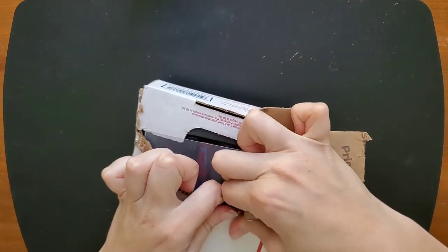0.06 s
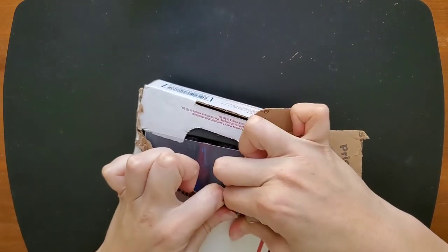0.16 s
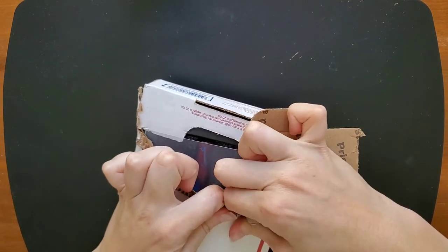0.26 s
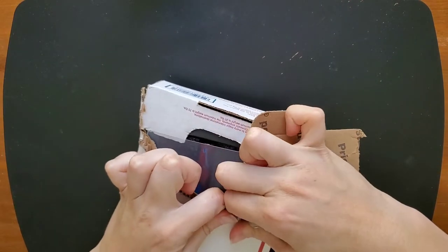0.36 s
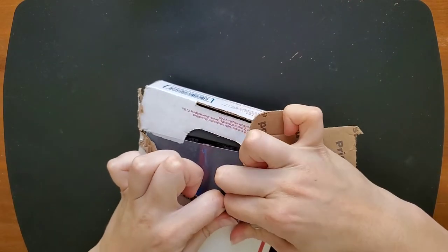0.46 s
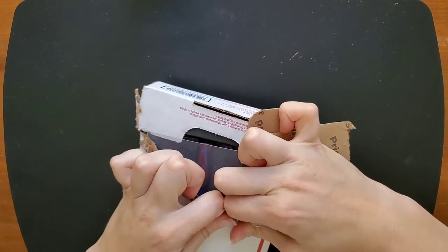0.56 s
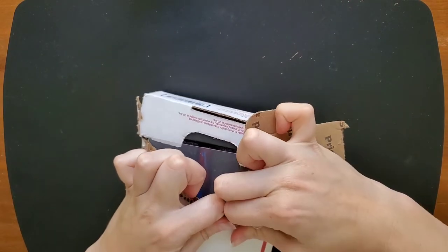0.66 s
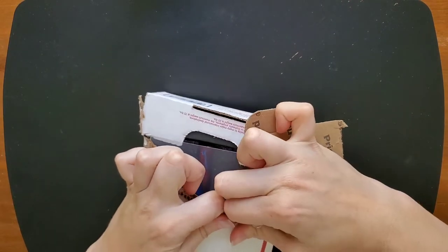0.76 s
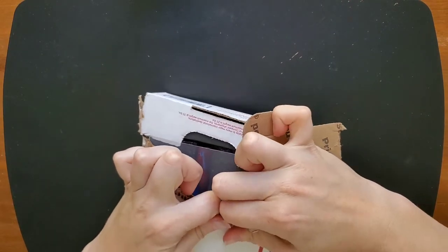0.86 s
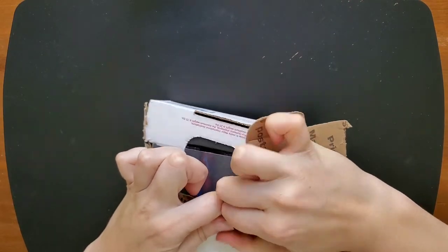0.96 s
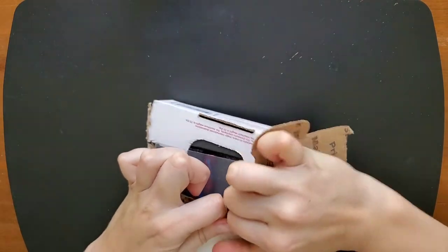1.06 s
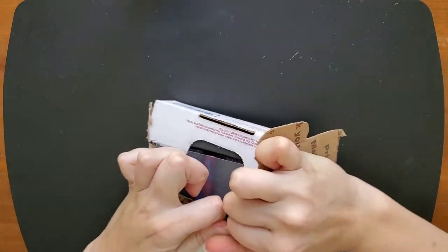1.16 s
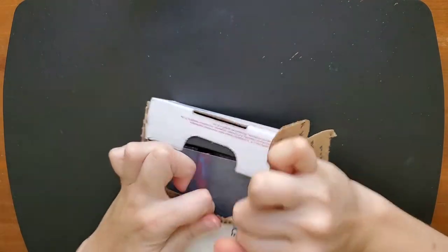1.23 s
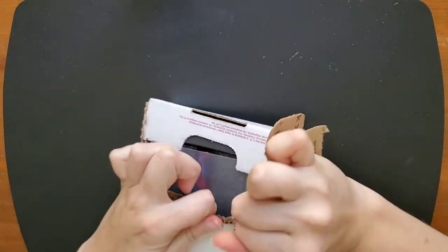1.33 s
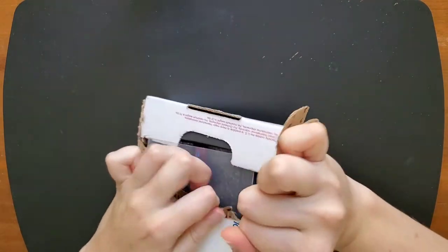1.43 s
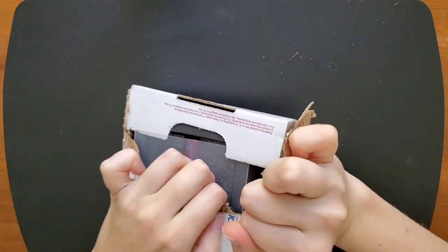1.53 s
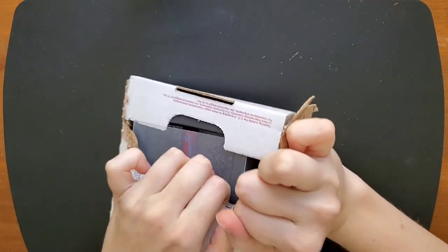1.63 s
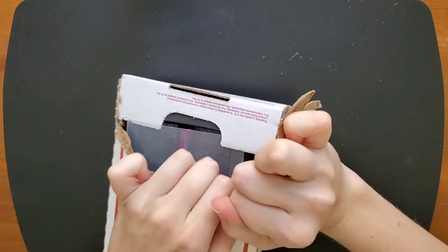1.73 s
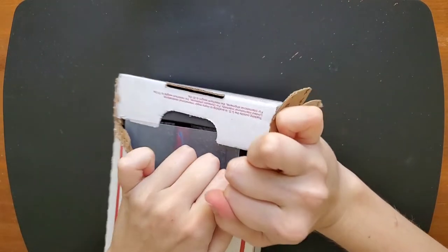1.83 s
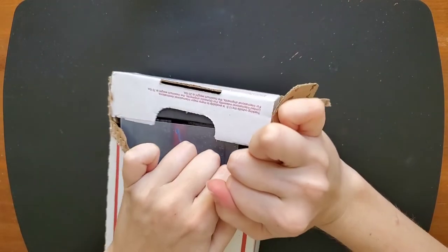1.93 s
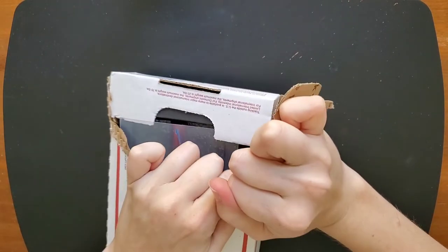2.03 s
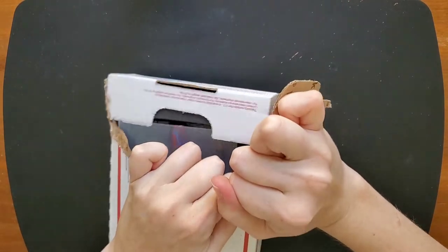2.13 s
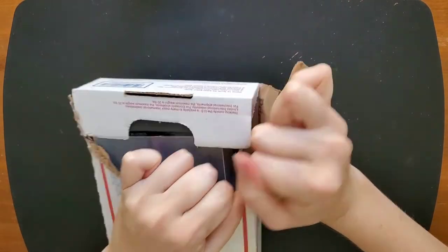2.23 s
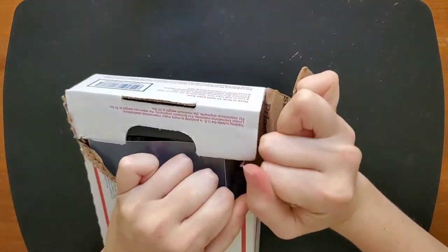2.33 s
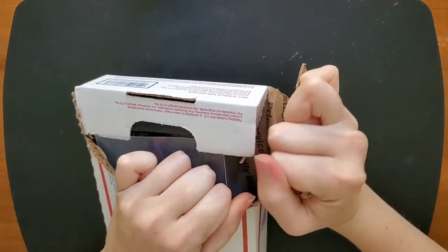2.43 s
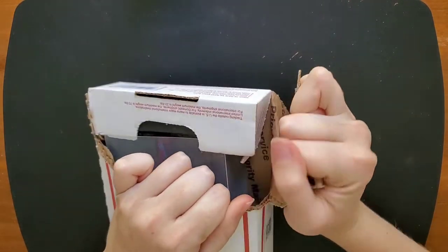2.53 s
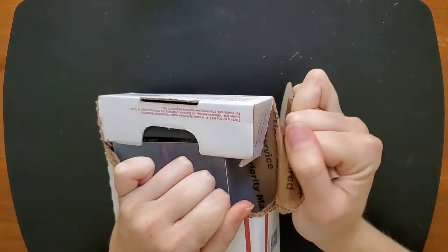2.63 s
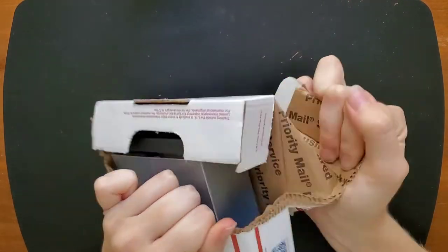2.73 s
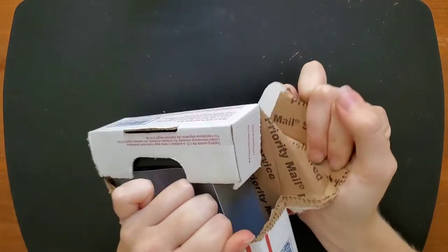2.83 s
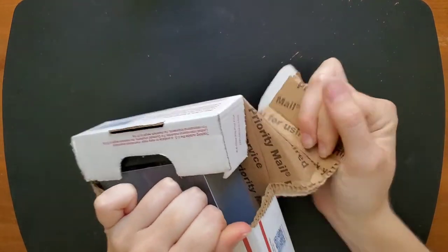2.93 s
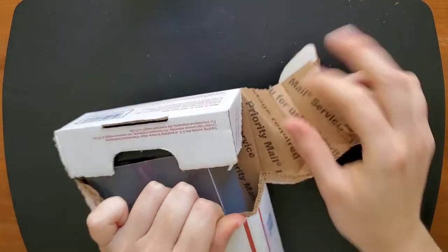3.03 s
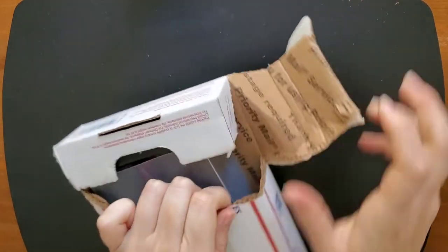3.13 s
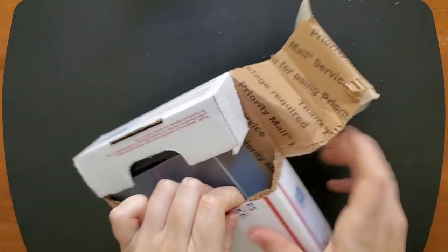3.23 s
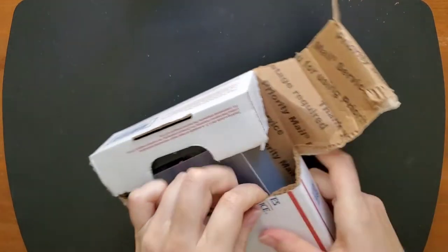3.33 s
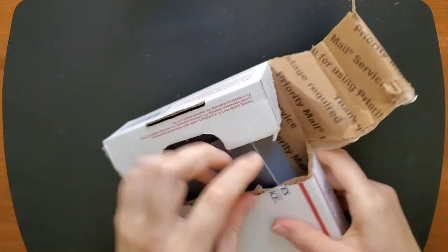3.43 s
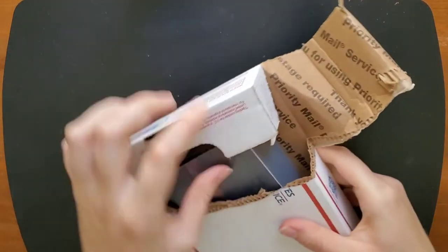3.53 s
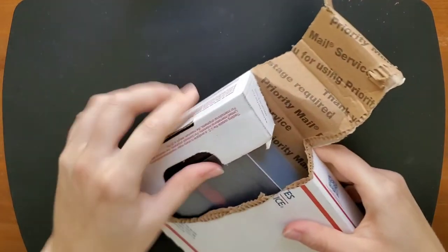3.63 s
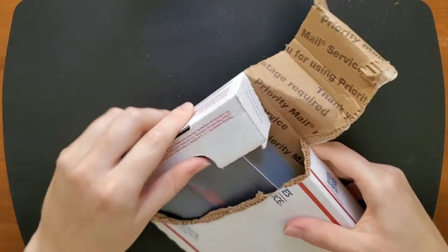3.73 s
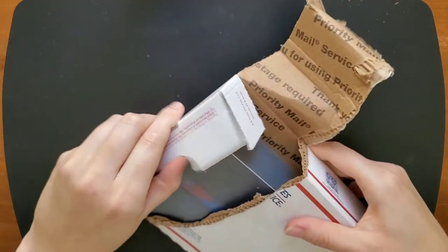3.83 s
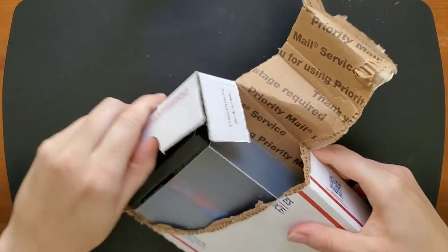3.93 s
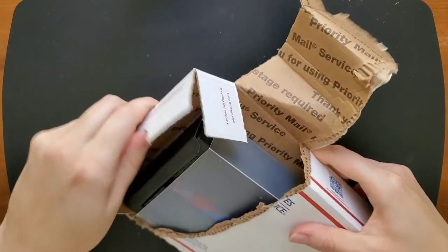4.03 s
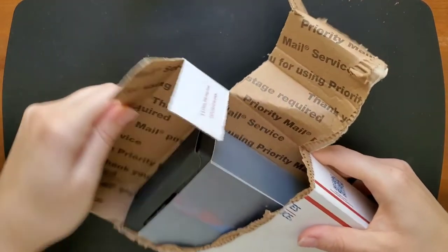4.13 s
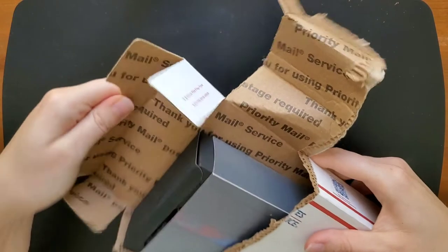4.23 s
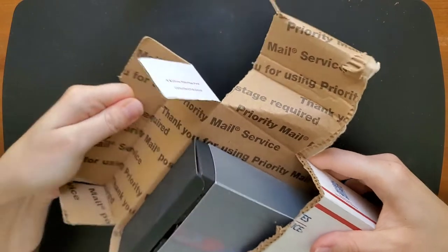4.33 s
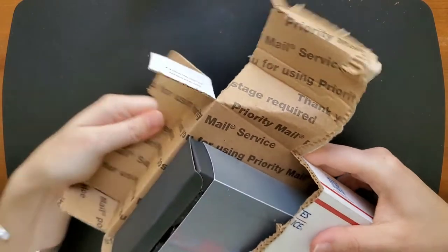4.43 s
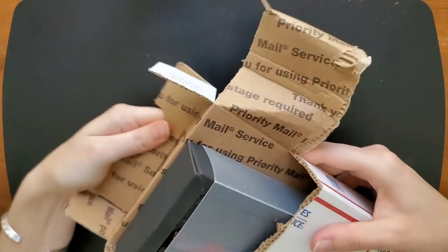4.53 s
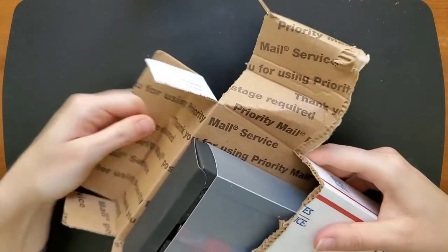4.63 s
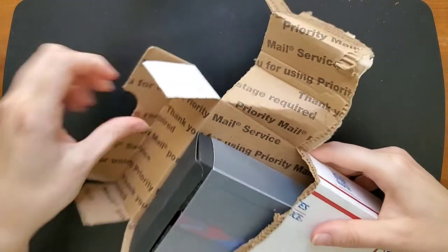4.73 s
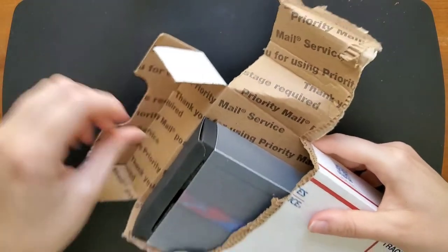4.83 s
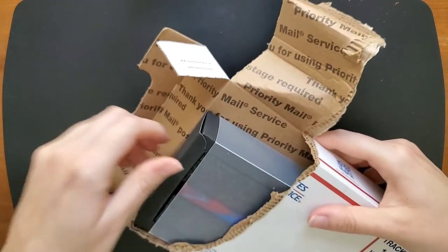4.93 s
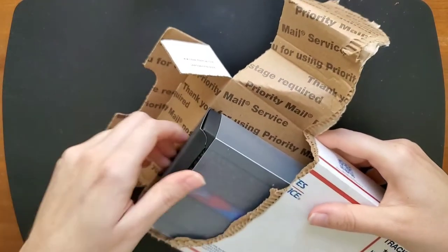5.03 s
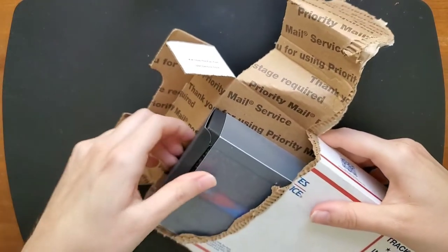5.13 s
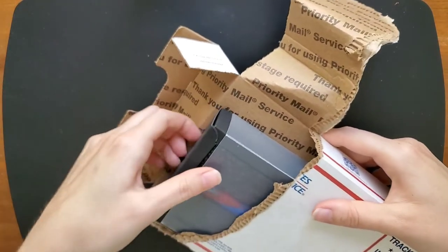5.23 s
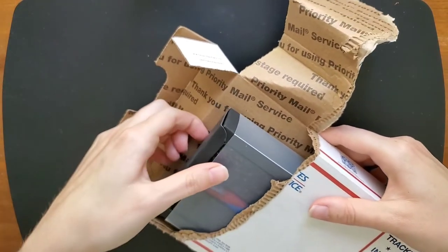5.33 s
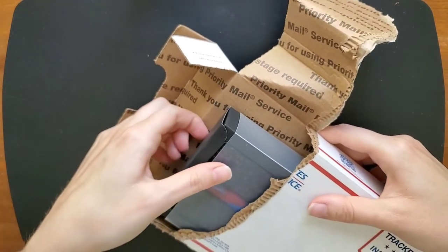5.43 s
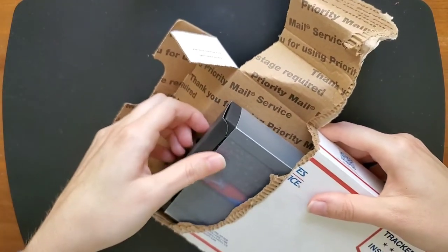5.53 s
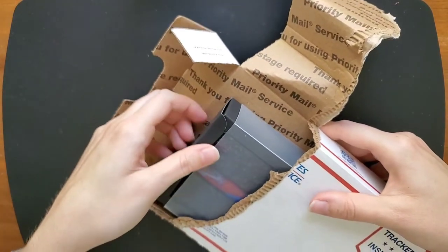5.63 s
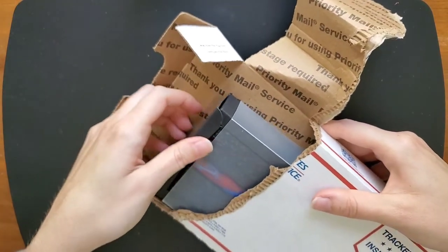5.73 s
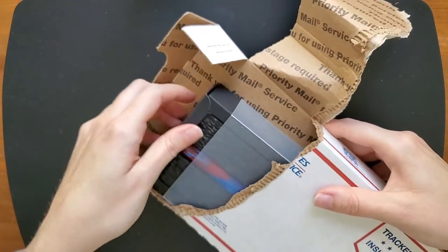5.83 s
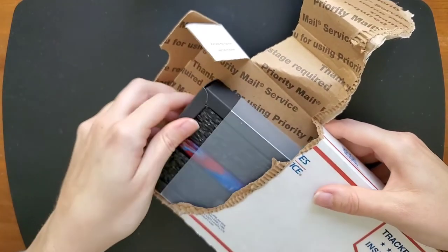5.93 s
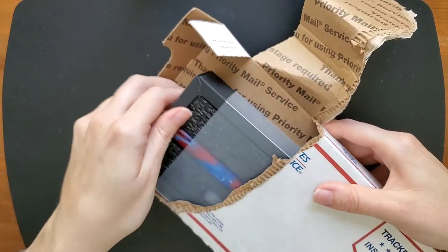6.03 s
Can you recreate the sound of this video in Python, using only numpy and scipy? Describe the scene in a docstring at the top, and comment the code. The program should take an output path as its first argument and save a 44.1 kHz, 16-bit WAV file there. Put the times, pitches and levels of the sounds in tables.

```python
"""A desk in a quiet room: two hands bend and rip a corrugated box, close under a phone with two microphones.
Room tone, desk rumble and creaking board (noise gated by slips) run from the start; folds soon begin to snap.
Snaps are noise bursts ringing panels and box, with torn fibre hiss; small flute breaks and desk bumps (decaying
sines) join in. The loudest cracks come near 1.26 s, 2.31 s and 2.76 s; from about 4.1 s the handling is mostly
lighter, with a strong snap near 5.08 s and harder creaking towards the end at 6.06 s."""
import sys
import numpy as np
from scipy import signal
from scipy.fft import rfft, irfft, next_fast_len
from scipy.io import wavfile
from scipy.ndimage import uniform_filter1d, map_coordinates

SR = 44100
rng = np.random.default_rng(int(sys.argv[2]) if len(sys.argv) > 2 else 0)


def wav_record(signal):
    """Record a signal, one row per channel, as 16-bit PCM in the file named by sys.argv[1]."""
    frames = np.transpose(np.atleast_2d(signal))
    bounded = np.clip(frames, -1, 1)
    # unit amplitude maps onto the largest positive 16-bit level
    quanta = np.round(bounded * 32767).astype(np.int16)
    wavfile.write(sys.argv[1], SR, quanta)


def to_linear_factor(level_db):
    """Convert decibel levels (scalar or array-like) to linear amplitude factors."""
    exponent = np.asarray(level_db, float) / 20
    return 10 ** exponent


N = 267246  # samples, 6.06 s


def unit(x):
    """Scaled to rms 1 along time, each channel by itself."""
    return x / np.sqrt(np.mean(x ** 2, axis=-1, keepdims=True) + 1e-20)


def along(points, hz):
    """(f/Hz, value) points read on a log frequency axis."""
    f, v = np.transpose(points)
    return np.interp(np.log(hz + 1), np.log(f + 1), v)


def filtered(x, response):
    """x times a response of frequency."""
    m = next_fast_len(x.shape[-1] + 8192)
    spectrum = rfft(x, m) * response(np.fft.rfftfreq(m, 1 / SR))
    return irfft(spectrum, m)[..., :x.shape[-1]]


def causal(gain):
    """Minimum-phase response with the given gain, by folding the cepstrum."""
    cep = irfft(np.log(gain + 1e-6))
    half = cep.shape[-1] // 2
    cep[..., 1:half] *= 2
    cep[..., half + 1:] = 0
    return np.exp(rfft(cep))


def peak(hz, centre_hz, width_hz):
    """Gain of one resonance, 1 at its centre."""
    return hz * width_hz / np.hypot(centre_hz ** 2 - hz ** 2, hz * width_hz)


def coloured(spectrum):
    """A steady colour from (f/Hz, level/dB) points."""
    return lambda hz, t: to_linear_factor(along(spectrum, hz))


def wobble(rate):
    """A smooth random curve, rate knots a second."""
    knots = rng.standard_normal(int(N * rate / SR) + 4)
    return map_coordinates(knots, [np.arange(N) * rate / SR])


def curves(rows):
    """One value per sample for each column after the time."""
    s, *cols = np.transpose(rows)
    return [np.interp(np.arange(N) / SR, s, c) for c in cols]


def at_times(curve):
    """A per-sample curve as a function of t/s."""
    return lambda t: np.interp(t * SR, np.arange(N), curve)


# likeness of left and right at the two microphones: f/Hz, correlation [0-1]
ALIKE = [(60, 0.51), (200, 1), (300, 0.51), (450, 0.59), (900, 0.15), (2400, 0.17), (8000, 0.047)]


def ports(pair, hz):
    """Two independent spectra mixed to left and right so that they correlate by ALIKE."""
    turn = np.arccos(np.clip(along(ALIKE, hz), 0, 1)) / 2
    mid, side = pair[0] * np.cos(turn), pair[1] * np.sin(turn)
    return np.array([mid + side, mid - side])


def texture(gain, grain, patchy_db):
    """Stereo noise gated by grain, coloured by gain(Hz, s), with patches shifting in time and pitch; rms 1."""
    hz, t, z = signal.stft(grain * rng.standard_normal((2, N)), SR, nperseg=512)
    field = uniform_filter1d(rng.standard_normal(z.shape[1:]), size=3, axis=0)
    field = uniform_filter1d(field, size=12, axis=1)
    patches = to_linear_factor(patchy_db * field / field.std())
    z = ports(z, hz[:, None]) * gain(hz[:, None], t) * patches
    return unit(signal.istft(z, nperseg=512)[1][:, :N])


# resonances of the hollow box: f/Hz, width/Hz, level/dB
BOX = [(420, 360, -4.5), (520, 39, -24), (615, 20, -25.5), (810, 45, 4), (1200, 110, -0.5),
       (1400, 480, -4.5), (1620, 46, -1.5), (2010, 270, -8), (2490, 62, -3), (2830, 320, -28.5),
       (3780, 350, -25)]


def hollow(hz, db, between_db):
    """Gain of the box resonances at strengths db, over a flat board at between_db."""
    centre, width, _ = np.transpose(BOX)[..., None]
    return np.sqrt(to_linear_factor(db) ** 2 @ peak(hz, centre, width) ** 2 + to_linear_factor(between_db) ** 2)


# strain on the board, heard as creak: t/s, level/dB
STRAIN = [(0, -51.5), (.04, -59.5), (.09, -53.5), (.14, -58.5), (.2, -54.5), (.25, -64), (.3, -63.5),
          (.38, -55), (.44, -56), (.52, -57), (.585, -52), (.66, -48.5), (.75, -63.5), (.8, -62),
          (.87, -60.5), (.95, -48.5), (1.01, -45), (1.1, -56), (1.22, -57), (1.24, -44.5), (1.26, -27.5),
          (1.32, -42), (1.39, -59.5), (1.45, -63), (1.6, -49.5), (1.72, -53), (1.85, -58), (1.92, -54.5),
          (2.12, -61.5), (2.2, -61), (2.26, -49), (2.3, -36), (2.33, -31.5), (2.37, -36), (2.41, -54.5),
          (2.55, -63), (2.6, -52), (2.66, -49), (2.7, -38.5), (2.755, -27.5), (2.8, -31.5), (2.83, -34.5),
          (2.87, -46.5), (2.98, -55.5), (3.04, -46.5), (3.13, -54.5), (3.2, -53.5), (3.28, -59),
          (3.34, -53), (3.39, -61.5), (3.43, -59.5), (3.47, -56), (3.63, -53), (3.69, -64), (3.75, -64),
          (3.82, -49.5), (3.89, -40), (3.925, -54), (3.95, -57), (4.04, -51.5), (4.09, -65), (4.12, -60.5),
          (4.15, -51), (4.195, -49.5), (4.23, -55.5), (4.28, -63.5), (4.38, -68), (4.47, -63),
          (4.63, -54.5), (4.72, -54), (4.8, -61.5), (4.84, -57.5), (4.856, -70.5), (4.91, -65), (4.95, -61),
          (4.978, -64.5), (5.01, -64), (5.05, -63), (5.12, -54.5), (5.21, -60), (5.235, -56), (5.28, -53),
          (5.34, -52), (5.43, -49.5), (5.5, -75), (5.55, -63), (5.63, -48.5), (5.68, -55), (5.73, -48.5),
          (5.78, -49), (5.84, -45.5), (5.88, -36.5), (5.94, -43), (5.98, -47), (6.035, -43.5),
          (6.06, -36.5)]
# grip, how freely the panels boom, how much fibre tears, how hard the box drags on the desk:
# t/s, boom level re creak/dB, fibre hiss level re creak/dB, drag level/dB
GRIP = [(0, 0.5, -7.5, 0), (.15, -1, -4, 8), (.4, -7, -10.5, 9), (.6, 8, -2.5, 10.5), (1.0, 7.5, -6.5, 13),
        (1.3, -1.5, -4.5, 6), (1.7, 4, -9, 1.5), (2.2, 2, -6, 9.5), (2.35, -10.5, -15, 10),
        (2.5, 2, 1.5, 1.5), (2.8, -12, -11.5, 9), (3.0, -6.5, -5, -5), (3.2, 0.5, 0, 3), (3.4, 5, -1.5, 3),
        (3.6, -6, -5, 0.5), (3.85, -9, -13, 2.5), (4.05, 1, -4.5, 1), (4.13, 3.5, -13.5, -9),
        (4.2, -3, -9.5, -5), (4.3, -8.5, -5, -1), (4.4, -3, -6.5, 0), (4.7, -5, -8.5, -5.5),
        (5.2, -6, -7, -2), (5.29, 8.5, -10, 1), (5.44, 4, -14, -6), (5.6, -4.5, -12.5, -3.5),
        (5.88, -0.5, -15.5, -10), (6.06, 0, -22.5, -14)]
RUMBLE_DB, RUMBLE_FOLLOWS = -57.5, 0.43  # dB at a creak of -51.5 dB and no drag; dB per dB of creak


def strain():
    """Creak, boom, fibre hiss and desk rumble in dB: the strain drives all, the grip shares it out."""
    (creak_db,), (boom_db, fibre_db, drag_db) = curves(STRAIN), curves(GRIP)
    rumble_db = RUMBLE_DB + RUMBLE_FOLLOWS * (creak_db + 51.5) + drag_db
    return creak_db, creak_db + boom_db, creak_db + fibre_db, rumble_db


def slips(rate, spread_db, life, share):
    """Envelope of stick-slip: random slips of scattered size, each dying in life seconds, over steady rubbing."""
    chance, size = rng.random((2, N))
    sizes = (chance < rate / SR) * to_linear_factor(spread_db * np.log(size + 1e-9))  # rate per second
    decay = np.exp(-np.arange(2000) / (life * SR))
    steady = np.sqrt(1 - share ** 2) * 0.31
    return steady + share * unit(signal.fftconvolve(sizes, decay)[:N])


# the panel under the fingers: t/s, middle pitch f/Hz, crackle share [0-1] before strain shifts it
# (tearing high, sliding low)
PANEL = [(0.0, 1900, 0.37), (0.15, 1400, 1), (0.7, 1400, 1), (1.3, 1600, 0.85), (2.0, 1690, 0.98),
         (2.35, 2700, 0.56), (2.6, 1820, 0.62), (2.72, 1370, 0.52), (2.8, 2220, 1), (2.9, 1890, 0.53),
         (3.2, 2630, 0.5), (3.45, 1980, 0.66), (3.71, 1400, 0.66), (3.75, 1900, 0.86), (3.84, 2400, 0.86),
         (3.88, 1400, 0.94), (4.0, 1900, 0.5), (4.08, 1900, 0.42), (4.12, 2700, 0.62), (4.21, 2600, 0.8),
         (4.24, 1900, 0.71), (4.34, 1820, 0.6), (4.4, 1190, 0.25), (4.63, 2680, 0.48), (4.8, 1600, 0.52),
         (5.05, 1790, 0.6), (5.2, 1900, 0.5), (5.23, 3180, 0.44), (5.38, 3100, 0.47), (5.41, 1900, 0.45),
         (5.52, 1400, 0.37), (5.65, 1680, 0.3), (5.75, 2030, 0.3), (5.87, 1320, 0.19), (6.06, 1830, 0.19)]
PANEL_WANDER = 0.11  # log wander of that pitch
# colour of the creaking board: f/Hz, level/dB
CREAK = [(400, -28), (750, -3.5), (1050, -4.5), (2500, -5), (3500, -7), (5000, -14), (8000, -45)]
# colour of the booming panels: f/Hz, level/dB
BOOM = [(150, -27.5), (300, -2.5), (420, 1), (850, -0.5), (1150, -9.5), (2000, -44.5)]
# colour of tearing fibre: f/Hz, level/dB
FIBRE = [(1500, -47), (2800, 9.5), (3600, 8), (4300, 7.5), (5500, 5), (7500, 6.5), (12000, -9),
         (16000, -10.5)]
RUSTLE_HZ, RUSTLE_WIDTH_HZ, RUSTLE_DB = 5500, 380, 7.5  # papery ring of skin sliding on the liner


def rubbing():
    """Strained board creaks around the pitch of the rubbed panel; the same slips shake the box and break fibres."""
    creak_db, boom_db, fibre_db, _ = strain()
    panel_hz, crackle = curves(PANEL)
    pitch = at_times(panel_hz * np.exp(PANEL_WANDER * wobble(16)))
    share = np.clip(crackle + 0.01 * (creak_db + 47.5), .1, .95)  # light touch slides evenly, hard strain crackles
    sliding, hiss_db = at_times(1 - share), at_times(fibre_db)

    def box(hz):
        return hollow(hz[:, 0], np.transpose(BOX)[2], between_db=-11.5)[:, None]

    def creak(hz, t):
        panel = to_linear_factor(2.0) * peak(hz, pitch(t), .12 * pitch(t))
        return to_linear_factor(along(CREAK, hz)) * np.hypot(box(hz), panel)

    def boom(hz, t):
        return to_linear_factor(along(BOOM, hz)) * box(hz)

    def rustle(hz, t):
        tilt = 0.026 * (hiss_db(t) + 77)  # dB per octave: hard tearing is brighter
        fibre = to_linear_factor(along(FIBRE, hz) + tilt * np.log2(hz / 7000 + 0.0012))
        skin = to_linear_factor(RUSTLE_DB) * sliding(t) * peak(hz, RUSTLE_HZ, RUSTLE_WIDTH_HZ)
        return fibre * np.hypot(1, skin)

    grain = slips(rate=200, spread_db=4, life=0.016, share=share)
    fine = slips(rate=300, spread_db=3.5, life=0.013, share=share)  # fibres also break on their own
    board = to_linear_factor(creak_db) * texture(creak, grain, patchy_db=3.0)
    board += to_linear_factor(boom_db) * texture(boom, grain, patchy_db=2.5)
    return board + to_linear_factor(fibre_db) * texture(rustle, 0.28 * grain + 1.2 * fine + 0.5, patchy_db=2.5)


# hands move sideways under the microphones: t/s, left lag/ms, left-right level difference/dB
PLACE = [(0, 0.1, -1), (1.2, 0.093, 0), (2.5, 0.077, -0.5), (3.1, 0.17, -0.5), (3.8, 0.074, -2),
         (4.1, 0.017, -0.5), (4.6, 0.073, 0.5), (5.3, -0.091, -2.5), (5.7, 0.19, -1)]


def placed(box):
    """Level and arrival time differ between the microphones as the hands move."""
    (lag_ms, pan_db), at = curves(PLACE), np.arange(N)
    half = lag_ms * SR / 2000  # half the lag, in samples
    left = map_coordinates(box[0], [at - half], order=5) * to_linear_factor(pan_db / 2)
    right = map_coordinates(box[1], [at + half], order=5) * to_linear_factor(-pan_db / 2)
    return np.array([left, right])


# colour of the desk rumble: f/Hz, level per Hz/dB
RUMBLE = [(15, -73), (25, -23), (70, -6), (114, -4), (151, -7), (184, -20), (300, -4.5), (390, -39),
          (660, -120)]


def rumble():
    """The box dragging on the desk top rumbles: low noise that follows strain and drag unsteadily."""
    level_db = strain()[3] + 3 * wobble(11)
    return to_linear_factor(level_db) * texture(coloured(RUMBLE), 1, patchy_db=3.5)


# colour of the room tone: f/Hz, level per Hz/dB
AIR = [(15, -55.5), (25, -32.5), (127, -37), (185, 1.5), (270, -28), (335, -1), (531, -24.5), (1160, -3.5),
       (1840, -17), (14800, -41), (16000, -57.5)]


def room_tone():
    """Faint steady noise of the quiet room."""
    return to_linear_factor(-70) * texture(coloured(AIR), 1, patchy_db=3)


# decay of the room: f/Hz, t60/s
ROOM = [(150, 0.29), (1000, 0.083), (5000, 0.1), (14000, 0.15)]


def room(x):
    """The room's answer, 300 samples late: each frequency of a noise tail dies at its own speed."""
    hz, t, z = signal.stft(rng.standard_normal((2, SR // 3)), SR, nperseg=256)
    decay = to_linear_factor(-60 * t / along(ROOM, hz)[:, None])
    tail = signal.istft(z * decay, SR, nperseg=256)[1]
    late = np.pad(x, ((0, 0), (300, 0)))
    return signal.fftconvolve(late, tail / np.linalg.norm(tail[0]), axes=1)[:, :N]


# low panels of the box, a small snap rings one of them: f/Hz
LOW_PANELS_HZ = [412, 497, 740, 840]
TICKS, TICK_DB, TICK_SPREAD_DB = 30, 9, 2.5  # count, peak over the creak, scatter
SMALL_T60_MS, SMALL_T60_SPREAD = 44, .1  # middle decay, log scatter


def ticks():
    """Small snaps at random moments, as loud as the strain allows; rows like SNAPS."""
    u, g = rng.random((TICKS, 2)).T, rng.standard_normal((TICKS, 4)).T
    s = u[0] * (N - 1) / SR
    db = np.interp(s, *np.transpose(STRAIN)) + TICK_DB + TICK_SPREAD_DB * g[0]
    low_hz, high_hz = rng.choice(LOW_PANELS_HZ, TICKS), 1100 + 1100 * u[1]
    high_db, fibre_db = -6 + 3 * g[1], -14 + 5 * g[2]
    t60_ms = SMALL_T60_MS * np.exp(SMALL_T60_SPREAD * g[3])
    return np.transpose([s, db, low_hz, high_hz, high_db, fibre_db, t60_ms])


# snaps of folds and seams: t/s, nominal peak level/dB, low panel f/Hz, high panel f/Hz,
# high panel level re peak/dB, fibre level re peak/dB, t60/ms
SNAPS = [(0.057, -32, 790, 1210, -4.5, -39, 55), (0.08, -24, 770, 2010, -5.5, -25, 55),
         (0.114, -28, 460, 1080, -25, -21, 38), (0.157, -26, 740, 1170, -3.5, -23, 58),
         (0.19, -25.5, 364, 1580, -0.5, -21, 48), (0.263, -34, 730, 1500, -16, -18, 35),
         (0.307, -32.5, 600, 1220, -3.5, -18, 39), (0.347, -30.5, 716, 1220, -3, -15, 42),
         (0.3665, -22, 373, 1250, -4.5, -23, 42), (0.39, -28, 376, 2000, -5.5, -14, 51),
         (0.417, -31, 810, 1640, -10, -22, 31), (0.458, -18, 800, 1590, -10, -20, 37),
         (0.505, -30, 740, 1400, -8, -30, 55), (0.538, -17, 720, 1220, -7.5, -16.5, 43),
         (0.57, -16, 840, 1120, 0.5, -36, 33), (0.577, -15, 725, 2860, -4, -36, 47),
         (0.6354, -13, 370, 1200, -3.5, -42, 30), (0.685, -12, 380, 1130, -8, -26, 48),
         (0.704, -31.5, 520, 2400, 1.5, -5.5, 64), (0.84, -23.5, 514, 1290, -3, -22, 66),
         (0.875, -30, 535, 1210, 3, -16, 45), (0.895, -25, 517, 1250, -1.5, -15, 37),
         (0.916, -26.5, 810, 1600, -1, -11.5, 53), (0.96, -24.5, 810, 1620, -3, -8, 39),
         (0.996, -19, 710, 1110, -6.5, -9, 29), (1.019, -20, 360, 2010, -8, -34, 45),
         (1.076, -16, 810, 2620, -4.5, -21.5, 40), (1.098, -17, 466, 1300, -15, -23, 49),
         (1.161, -27, 726, 980, -8, -39.5, 40), (1.238, -32.5, 784, 1130, -1, 6.5, 61),
         (1.247, -21, 740, 3160, 4, -6, 35), (1.254, -14.5, 490, 1860, -1.5, -3.5, 41),
         (1.2619, -2, 685, 1140, -1.5, -12.5, 28), (1.27, -16.5, 999, 1140, 5, -11, 37),
         (1.28, -15.5, 920, 1870, -4, -11, 81), (1.303, -20.5, 810, 1090, 1.5, -21, 45),
         (1.421, -24.5, 844, 1600, -4.5, -19.5, 46), (1.574, -31.5, 490, 1610, -8, -20, 46),
         (1.714, -26.5, 420, 1900, -6, -11.5, 25), (1.755, -32.5, 740, 1100, -3, -13, 70),
         (1.863, -35.5, 506, 1810, -3, -12, 77), (1.886, -25.5, 507, 1320, -7, -30, 48),
         (1.906, -21.5, 490, 3000, -4, -11.5, 27), (2.043, -26.5, 415, 1340, -13, -23, 65),
         (2.063, -21.5, 420, 1690, -4.5, -26.5, 38), (2.108, -27.5, 740, 1370, -5, -22, 35),
         (2.161, -26.5, 510, 1680, -8, -21, 50), (2.235, -20.5, 730, 1410, -6, -17, 54),
         (2.269, -17, 810, 2010, -5.5, -12.5, 50), (2.291, -12.5, 520, 1500, -7, -35, 28),
         (2.302, -11.5, 696, 1270, -3.5, -20, 68), (2.312, -2, 810, 2010, -3, -14, 22),
         (2.316, -5.5, 535, 3000, -4.5, -32, 51), (2.375, -20, 800, 1570, -3.5, -19, 63),
         (2.57, -28.5, 706, 1620, -4.5, -6, 63), (2.601, -26.5, 750, 1810, -8, -6, 58),
         (2.639, -25.5, 650, 1860, -5, -4.5, 39), (2.676, -26.5, 626, 1910, -10, -12, 51),
         (2.706, -17, 610, 1290, -1, -12, 64), (2.746, -11.5, 900, 1130, 0, -22, 59),
         (2.76, -6.5, 940, 2400, -2, -5, 47), (2.785, -7.5, 533, 2200, -1.5, -15, 53),
         (2.901, -31.5, 478, 2050, -8, -9, 29), (3.015, -34, 784, 2100, 0.5, -4, 59),
         (3.05, -25.5, 790, 2310, 8, -18, 29), (3.061, -22, 786, 1040, -5, -14, 39),
         (3.096, -32.5, 450, 2490, -0.5, 4, 36), (3.171, -19.5, 528, 1100, -9, -28, 48),
         (3.436, -29, 405, 1830, -2, -12, 52), (3.51, -31.5, 412, 1200, -6, -6.5, 58),
         (3.573, -22, 824, 1850, -8, -6.5, 53), (3.63, -25, 1020, 1226, -5.5, -15.5, 58),
         (3.714, -33.5, 980, 1030, -7.5, -14.5, 55), (3.765, -32.5, 646, 1730, -1, -16, 42),
         (3.773, -28, 780, 2290, -6.5, -15.5, 61), (3.898, -23.5, 740, 1400, -10, -12, 41),
         (3.938, -22.5, 420, 2050, -6, -20.5, 61), (4.014, -30.5, 810, 1960, -4, -37, 79),
         (4.044, -31.5, 780, 1920, 5.5, -42, 47), (4.3125, -39.5, 770, 2310, -4, -5, 18),
         (4.424, -40.5, 787, 1120, -1, -29, 30), (4.595, -39, 783, 1200, -7, -14.5, 55),
         (4.636, -35.5, 760, 2760, -2.5, -7, 53), (4.715, -37, 766, 1400, -3, -30, 46),
         (4.761, -26, 730, 1560, -2, -11.5, 46), (4.817, -31.5, 710, 1670, -13, -18.5, 43),
         (4.914, -44.5, 690, 1200, 0.5, -14, 51), (4.953, -48.5, 883, 2400, 2, -3.5, 62),
         (4.996, -44, 619, 1970, 0.5, -8, 74), (5.075, -17.5, 786, 1840, -4.5, -24, 58),
         (5.132, -30, 835, 1160, -5, -20, 44), (5.329, -35.5, 830, 2340, -7, -7.5, 40),
         (5.562, -48.5, 870, 1200, -18.5, -36, 61), (5.591, -45.5, 802, 1280, -11, -8.5, 49),
         (5.739, -30, 760, 2030, -11, -14.5, 43), (5.85, -33, 444, 1280, 0, -30, 84),
         (5.876, -26, 960, 1400, 2, -26, 66), (5.95, -31, 825, 2010, -8, -31, 24)]
SHARP_T60_MS = 30.6  # snaps shorter than this crack harder and ring broader, longer ones ring purer
PANEL_WIDTH_HZ = 105  # the hands damp the low panels


def snaps():
    """Each snap is a crack and a ragged run of breaking fibres; it rings a low and a high panel and the box modes."""
    rows = np.vstack([breaks(), SNAPS, ticks()])
    s, db, low_hz, high_hz, high_db, fibre_db, t60_ms = np.transpose(rows)[..., None]
    t60 = t60_ms / 1000
    blur = np.clip(SHARP_T60_MS / np.maximum(t60_ms, 1), .4, 3) ** 1.43
    t, hz = np.arange(8192) / SR, np.fft.rfftfreq(8192, 1 / SR)
    noise = rng.standard_normal((3, len(s), len(t)))

    ragged = to_linear_factor(5.5 * unit(uniform_filter1d(noise[2], size=60)))  # breaks come in millisecond clumps
    rattle = ragged * to_linear_factor(-60 * t / np.clip(t60, .008, .3)) * (t < .15)
    sudden = np.clip((.1 - t60) / 0.064, 0, 1)  # short snaps start with a crack, long ones swell
    onset = 1 - np.exp(-(t / (.006 - 0.0051 * sudden)) ** 2)
    burst = noise[:2] * onset * (rattle + 0.98 * sudden * to_linear_factor(-60 * t / 0.024))
    tearing = burst * (1 - np.exp(-t / .002))  # fibres follow the crack
    crack = 40 * blur[:, 0] ** 0.67 * sudden[:, 0]
    burst[:, :, 12] += crack * np.sign(noise[:2, :, 0]) * [[1], [.3]]

    strengths = np.transpose(BOX)[2] + 3 * rng.standard_normal((len(s), len(BOX)))
    box = hollow(hz, strengths, between_db=-30.5)
    low = to_linear_factor(along(BOOM, hz)) * np.hypot(box, to_linear_factor(7) * peak(hz, low_hz, PANEL_WIDTH_HZ))
    high = to_linear_factor(along(CREAK, hz)) * np.hypot(box, to_linear_factor(11.5) * peak(hz, high_hz, 0.16 * blur * high_hz))
    fibre = to_linear_factor(along(FIBRE, hz))
    bending = np.exp(-1j * 0.8003 * np.sqrt(hz))  # bending waves in board: high pitches arrive first

    low_share = np.sqrt(np.clip(1 - to_linear_factor(high_db) ** 2, .03, 1))  # what the high panel leaves of the power
    sound = 0
    for source, gain, share in ((burst, low, low_share), (burst, high, to_linear_factor(high_db)),
                                (tearing, fibre, to_linear_factor(fibre_db))):
        part = irfft(ports(rfft(source) * causal(gain) * bending, hz))
        power = uniform_filter1d(np.mean(part ** 2, axis=0), size=300)
        sound = sound + share * part / np.sqrt(power.max(axis=1))[:, None]
    sound = to_linear_factor(db - 11.5) * sound  # from peak to short-time rms
    out = np.zeros((2, N + len(t)))
    for k, start in enumerate(np.round(s[:, 0] * SR).astype(int)):
        out[:, start:start + len(t)] += sound[:, k]
    return out[:, :N]


# single flutes break, short and crisp: t/s, nominal peak level/dB, high panel f/Hz, fibre level re peak/dB
BREAKS = [(0.212, -31, 730, -36), (0.359, -39.5, 1280, -1), (0.459, -27, 1570, -19.5),
          (0.558, -23, 1950, -8), (0.5702, -12, 1510, -15), (0.578, -14.5, 820, -28), (0.6, -37, 696, -20),
          (0.61, -30, 720, -20), (0.66, -32, 1300, -12), (0.738, -31.5, 780, -12),
          (0.856, -26.5, 1620, -20), (0.866, -28, 810, -29), (0.887, -30, 1270, -17),
          (0.931, -30, 750, -19), (0.943, -39, 1210, -12), (0.953, -21, 806, -20), (1.007, -19, 786, -28),
          (1.037, -34, 834, -12), (1.225, -39, 1500, 5), (1.328, -28, 1090, -17), (1.4205, -35, 1710, -27),
          (1.481, -41, 830, -6), (1.984, -48, 740, -13), (2.018, -36, 756, -26), (2.094, -35, 760, -7.5),
          (2.133, -29, 770, -22), (2.186, -37, 778, -7.5), (2.208, -35, 920, -11), (2.262, -27, 794, -9),
          (2.286, -16, 815, -15), (2.331, -24, 2400, -4), (2.346, -19, 1700, -13),
          (2.358, -23.5, 2750, -16), (2.485, -47, 3150, 3), (2.582, -30, 1870, -16.5),
          (2.625, -23, 726, -10), (2.685, -34, 1200, 1), (2.715, -39, 1280, -18.5), (2.729, -32, 1240, -9),
          (2.7451, -10.5, 1060, -5), (2.753, -12, 1200, -9), (2.767, -14.5, 1540, -2.5),
          (2.779, -16, 2040, -14), (2.798, -21, 2110, -5), (2.808, -32, 1310, -6), (2.82, -23, 2430, -8),
          (3.462, -36, 2000, -15), (3.479, -38.5, 900, -1), (3.838, -33, 2400, -27), (3.852, -36, 910, -28),
          (3.879, -35, 1400, 0), (3.902, -28, 850, -16), (3.958, -34.5, 710, -9), (4.122, -37.5, 810, -25),
          (4.189, -28, 1040, -17), (4.198, -27, 640, -24), (4.571, -44, 802, -6), (4.763, -32.5, 1630, -14),
          (4.8, -43, 920, -21), (4.867, -48.5, 1880, -3), (4.933, -51, 1280, 2), (5.816, -43, 810, -19),
          (5.0761, -28, 2920, -19), (5.227, -40, 850, -22.5), (5.751, -38, 680, -15),
          (5.784, -32, 770, -20), (5.865, -26, 1100, -22), (5.898, -36, 1220, -22), (5.921, -25, 703, -27),
          (6.02, -30, 756, -22), (6.045, -26, 740, -28), (6.055, -18.5, 1600, -36)]
BREAK_T60_MS, BREAK_HIGH_DB = 31, -1.5  # decay; level of the high panel re peak


def breaks():
    """The flute breaks as rows like SNAPS, each on a chance low panel."""
    s, db, hz, fibre_db = np.transpose(BREAKS)
    low_hz, same = rng.choice(LOW_PANELS_HZ, len(s)), np.ones(len(s))
    return np.transpose([s, db, low_hz, hz, BREAK_HIGH_DB * same, fibre_db, BREAK_T60_MS * same])


# the box bumps the desk: t/s, nominal level/dB, hardness/dB per octave, t60/s before each mode's own factor
BUMPS = [(0.367, -59.5, 18, 0.094), (0.684, -53, 12, 0.4), (0.792, -43.5, -1.5, 0.19),
         (1.096, -28.5, 1, 0.22), (1.262, -41, 2.5, 0.21), (1.421, -41.5, 0.5, 0.19),
         (1.716, -48, -7, 0.15), (1.909, -55.5, 12, 0.29), (2.06, -66.5, 11, 1), (2.2954, -21, -0.5, 0.13),
         (2.759, -43, 3.5, 0.6), (3.05, -56, -6, 0.19), (3.173, -28, -3.5, 0.23),
         (3.439, -34.5, -23, 0.095), (3.573, -68, 21.5, 0.11), (3.901, -38.5, 4.5, 0.19),
         (3.945, -59, 13.5, 0.48), (4.76, -59, -18, 0.24), (5.078, -69, 14, 0.18), (5.135, -74, 17, 0.3),
         (5.748, -59, 9.5, 0.25)]
# low modes of the desk top: f/Hz, level/dB, t60 as a multiple of the bump's
DESK = [(65.5, -16.5, 2.6), (88, -0.5, 0.81), (119.7, -1, 0.34), (152.5, 1, 0.48), (185, -16.5, 0.28),
        (218.6, -1.5, 0.23), (255.3, -12, 0.39)]


def bumps():
    """A soft push on the desk top rings its low modes, the lowest building last."""
    out, t = np.zeros(N + SR), np.arange(SR // 2) / SR
    for s, db, hard, t60 in BUMPS:
        ring = 0
        for hz, level, life in DESK:
            mode_db = level + hard * np.log2(hz / 88) + rng.normal(0, 1.0)
            build = 1 - np.exp(-t * hz / 0.32)
            ring = ring + to_linear_factor(mode_db - 60 * t / (life * t60)) * np.sin(2 * np.pi * hz * t) * build
        out[round(s * SR):][:len(t)] += to_linear_factor(db) * ring
    # the bumps carry little below about 40 Hz
    return filtered(out[:N], lambda hz: causal(to_linear_factor(along([(25, -32.5), (58, 7.5)], hz))))


def scene():
    """Box and desk in the room, over its faint tone; the room answers the box."""
    box = placed(rubbing() + snaps())
    return box + to_linear_factor(-7.0) * room(box) + rumble() + bumps() + room_tone()


def band_limit(x):
    """A steep low-pass at the top of the band."""
    return signal.sosfilt(signal.butter(12, 16810, fs=SR, output="sos"), x)


# response of the microphone port: f/Hz, level/dB
PORT = [(25, -16.5), (55, -7), (6500, 6), (8000, 4), (9600, 2.5), (11500, 14), (14000, 16.5)]
TOP_HZ = 15700  # the treble falls away steeply above this


def record(dry):
    """The microphone port dips near 10 kHz; little is heard above TOP_HZ; the loudest cracks saturate softly."""
    def port(hz):
        return causal(to_linear_factor(along(PORT, hz)))

    def treble_end(hz):
        return 1 / np.hypot(1, (hz / TOP_HZ) ** 100)

    heard = filtered(dry, lambda hz: port(hz) * treble_end(hz))
    heard = heard / (1 + np.abs(heard / .9) ** 6) ** (1 / 6)
    return band_limit(heard)


dry = scene()
out = record(dry)
wav_record(out)
```